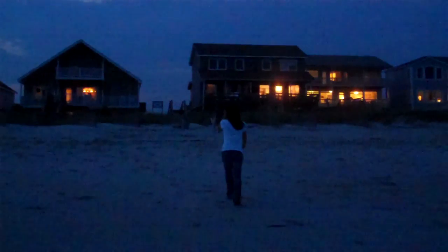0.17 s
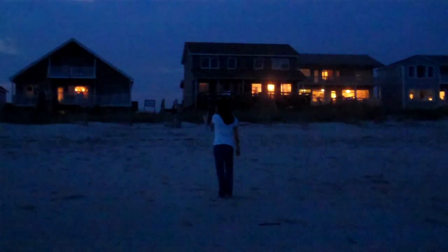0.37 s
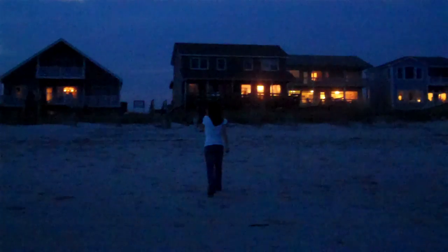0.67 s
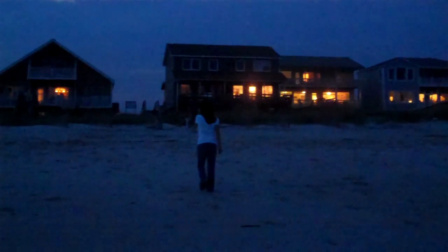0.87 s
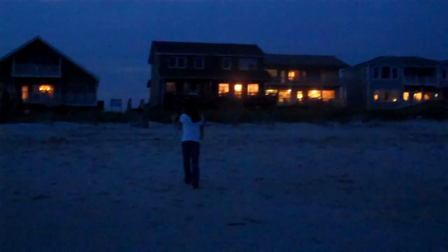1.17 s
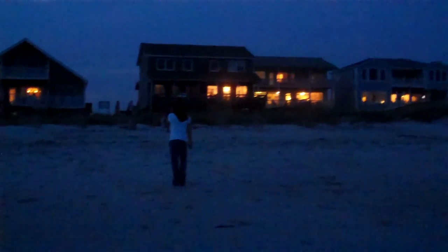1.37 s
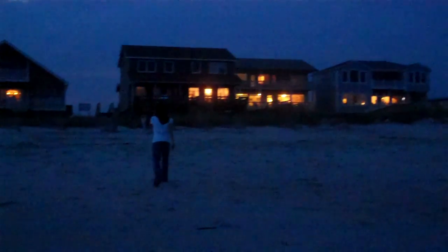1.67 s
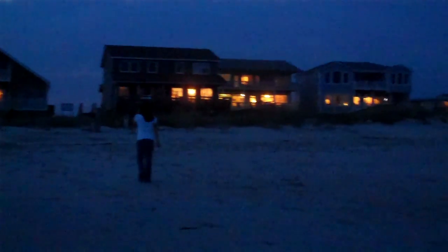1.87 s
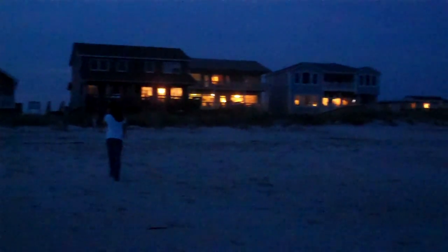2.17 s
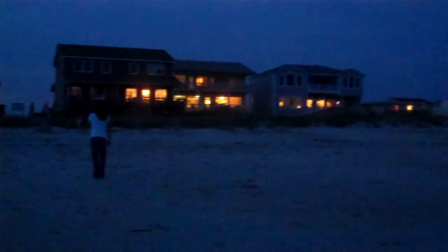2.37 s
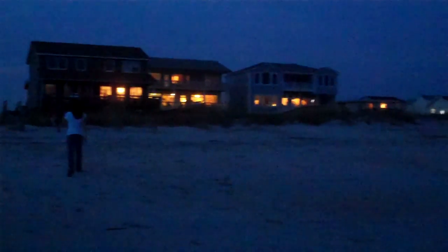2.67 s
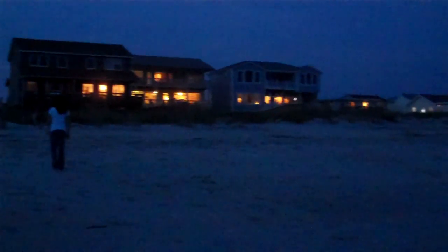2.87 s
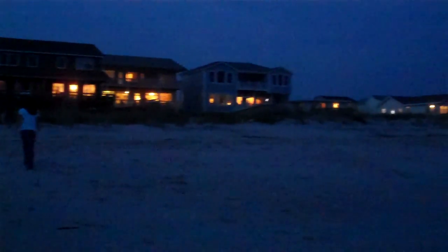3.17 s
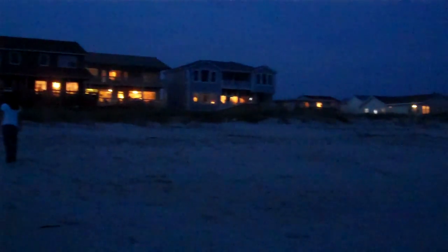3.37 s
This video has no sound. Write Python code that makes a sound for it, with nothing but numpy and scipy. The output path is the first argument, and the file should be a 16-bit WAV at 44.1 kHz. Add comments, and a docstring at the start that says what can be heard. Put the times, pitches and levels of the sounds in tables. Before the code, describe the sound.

Wind buffets a camera's stereo microphone on an open beach, light flutters first, then hard thumping, distorted gusts from the middle onward, over a continuous soft rush of surf with no distinct wave crashes.

```python
"""Windy beach surf

Surf rushes steadily while wind buffets the two ports of a camera microphone.
The surf is noise with drifting patches, shaped in short-time spectra and shared in part by the ports.
Each port has its own lumpy low rumble, short noise bursts for eddies and sharp pressure snaps.
The camera's gain control ducks on the loudest blows; overload clips; the left port drops out once."""
import sys
import numpy as np
from scipy import signal
from scipy.fft import rfft, irfft
from scipy.io import wavfile
from scipy.ndimage import uniform_filter1d

SR = 44100
rng = np.random.default_rng(int(sys.argv[2]) if len(sys.argv) > 2 else 0)


def decibels_to_gain(level_db):
    """Convert a level in decibels to a linear amplitude gain (20 dB per decade)."""
    exponent = np.asarray(level_db, float) / 20
    return 10 ** exponent


def wrap_up_sound(samples):
    """Save the sound to the file named by the first command line argument, as 16-bit audio."""
    columns = np.atleast_2d(samples).T
    # keep every value between -1 and 1, then stretch to whole-number steps
    tamed = np.clip(columns, -1, 1)
    steps = np.round(tamed * 32767).astype(np.int16)
    wavfile.write(sys.argv[1], SR, steps)


N = 154791  # samples


def evened(x):
    """Scales to rms 1."""
    return x / np.sqrt(np.mean(x ** 2) + 1e-20)


def read(points, hz):
    """Reads a table on a log-frequency axis."""
    f, value = np.transpose(points)
    return np.interp(np.log(hz + 1), np.log(f + 1), value)


def colour(x, points):
    """Filters noise to a spectrum, then scales it to rms 1."""
    gain = decibels_to_gain(read(points, np.fft.rfftfreq(N, 1 / SR)))
    return evened(irfft(rfft(x) * gain, N))


# swell of the surf: [t/s, level/dB, tilt/dB of the body under the hiss]
SURF_SWELL = [(0, -29.5, 0.7), (.75, -28.5, 2), (1.25, -27, 0.4), (1.7, -28.5, -0.5), (1.88, -30.5, 0),
              (2.3, -32.5, -3.5), (2.7, -32, -0.5), (3.101, -29.5, -2.5), (3.5, -32.5, -1)]
# tone of the surf: [f/Hz, relative level/dB]
SURF_SPECTRUM = [(60, -12), (200, -8.5), (344, -4), (800, -8), (1700, -11), (2150, -14.5), (2700, -18.5),
                 (4500, -20), (8530, -32.5), (10700, -39), (13900, -68)]
# how alike the surf is at the two ports: [f/Hz, likeness 0 to 1]
PORT_LIKENESS = [(100, 0.89), (400, 1), (1600, 0.86), (2500, 0.41), (4500, 0.74), (7000, 0.43),
                 (8500, 0.66), (12000, 0.41)]
# phase of the shared surf, left ahead of right: [f/Hz, lead/rad], negative where left lags
LEFT_LEAD = [(100, -0.4), (1500, -0.76), (2930, -2.5), (5500, -3), (7750, -5), (12000, -10.5)]
# surf balance, left minus right: [f/Hz, difference/dB]
LEFT_BALANCE = [(1880, -2), (3070, -3.5), (5020, -5.5), (8220, -10), (13400, -12.5)]


def surf(patchy_db=0.94, flicker_db=0.19):
    """Random short-time spectra with drifting patches, reaching the two ports with a lag."""
    size, hop, body_hz = 1024, 256, 2500
    frames, hz = N // hop + 5, np.fft.rfftfreq(size, 1 / SR)
    a, b, c, d, patches = rng.standard_normal((frames, len(hz), 5)).T
    patches = uniform_filter1d(patches, size=14, axis=0)  # across frequency
    patches = evened(uniform_filter1d(patches, size=12, axis=1))  # across time
    flicker = evened(uniform_filter1d(rng.standard_normal(frames), size=16))

    # the left port hears part of the right port's noise, turned in phase, and part of its own
    likeness = np.clip(read(PORT_LIKENESS, hz), -1, 1)[:, None]
    right, own = a + 1j * b, c + 1j * d
    left = likeness * right + np.sqrt(1 - likeness ** 2) * own
    left = left * np.exp(1j * read(LEFT_LEAD, hz))[:, None]
    half = decibels_to_gain(read(LEFT_BALANCE, hz) / 2)[:, None]
    spectra = np.array([left * half, right / half])

    s, level_db, tilt_db = np.transpose(SURF_SWELL)
    body = 1 / (1 + (hz / body_hz) ** 4)
    tilt = body[:, None] * np.interp(np.arange(frames) * hop / SR, s, tilt_db)
    tone_db = read(SURF_SPECTRUM, hz)[:, None] + tilt
    spectra *= decibels_to_gain(tone_db + patchy_db * patches + flicker_db * flicker)
    noise = signal.istft(spectra, nperseg=size, noverlap=size - hop)[1][:, :N]
    return decibels_to_gain(np.interp(np.arange(N) / SR, s, level_db)) * evened(noise)


# gusts, before the lumps are added: [t/s, left port level/dB, right port level/dB]
GUST_LEVEL = [(0, -30, -29), (.5, -37.5, -28), (.95, -33, -31.5), (1.15, -32, -29), (1.3, -21.5, -23.5),
              (1.45, -21, -20.5), (1.62, -28.5, -29.5), (1.779, -17, -21.5), (1.95, -21.5, -30),
              (2.17, -18, -18), (2.31, -29, -33), (2.45, -18.5, -23.5), (2.7, -33.5, -39),
              (2.88, -29, -31.5), (3.05, -14.5, -18.5), (3.28, -48, -44), (3.5, -25.5, -30)]
# tone of the rumble and of soft eddies: [f/Hz, relative level/dB]
RUMBLE_SPECTRUM = [(12, -44), (25, -4), (60, 0.5), (150, -5), (350, -13), (900, -31), (2500, -72)]


def rumble():
    """Low noise in random lumps, unrelated at the two ports."""
    lump_db, lump_s, tallest = 6, 0.01, 1.3  # spread, smoothing length, cap in spreads
    s, *port_db = np.transpose(GUST_LEVEL)
    t, width = np.arange(N) / SR, max(int(lump_s * SR), 2)
    lumps = uniform_filter1d(rng.standard_normal((2, N)), width)
    lumps = evened(uniform_filter1d(lumps, width))
    gust_db = np.array([np.interp(t, s, db) for db in port_db])
    noise = colour(rng.standard_normal((2, N)), RUMBLE_SPECTRUM)
    return decibels_to_gain(gust_db + lump_db * np.minimum(lumps, tallest)) * noise


# the strongest eddies: [middle t/s, length at half height t/s, level/dB, port 0 left 1 right]
EDDY_BURSTS = [(0.076, 0.022, -17, 1), (0.153, 0.018, -20, 1), (0.629, 0.039, -15.5, 1),
               (0.945, 0.022, -19, 1), (1.205, 0.026, -21, 0), (1.41, 0.023, -12, 0),
               (1.458, 0.018, -13, 1), (1.504, 0.034, -16, 0), (1.558, 0.028, -14, 0),
               (1.57, 0.019, -11, 1), (1.634, 0.016, -16.5, 1), (1.699, 0.019, -16, 0),
               (1.762, 0.02, -9.5, 0), (1.794, 0.016, -12.5, 0), (1.795, 0.029, -12, 1),
               (1.873, 0.047, -15, 0), (2.168, 0.03, -15, 1), (2.175, 0.022, -11.5, 0),
               (2.252, 0.026, -15.5, 0), (2.364, 0.028, -10.5, 0), (2.394, 0.028, -11, 0),
               (2.502, 0.01, -14, 0), (2.819, 0.037, -17.5, 0), (2.93, 0.018, -11, 0),
               (2.993, 0.045, -15, 0), (3.031, 0.026, -16, 0), (3.045, 0.022, -14.5, 1),
               (3.06, 0.014, -5, 0), (3.115, 0.014, -7, 0), (3.129, 0.01, -9.5, 0),
               (3.134, 0.0094, -9.5, 1), (3.179, 0.016, -15.5, 0)]
# tone of a hard eddy: [f/Hz, relative level/dB]
HARD_EDDY_SPECTRUM = [(12, -37), (25, -1.5), (60, -1), (220, -1.5), (400, -9), (900, -24.5), (3000, -44.5),
                      (6000, -77)]


def eddies():
    """Each eddy is a burst of turbulence at one port; harder ones are brighter."""
    soft_db, hard_db = -17, -14.5  # eddies brighten between these levels
    noise = rng.standard_normal((2, N))
    dull, bright = colour(noise, RUMBLE_SPECTRUM), colour(noise, HARD_EDDY_SPECTRUM)
    t, out = np.arange(N) / SR, np.zeros((2, N))
    for middle, length, level_db, port in EDDY_BURSTS:
        port = round(port)
        start, end = int((middle - 2 * length) * SR), int((middle + 2 * length) * SR)
        near = slice(max(start, 0), end)
        hard = np.clip((level_db - soft_db) / (hard_db - soft_db), 0, 1)
        shape = np.exp(-np.log(2) * (2 * (t[near] - middle) / length) ** 2)
        burst = shape * ((1 - hard) * dull[port, near] + hard * bright[port, near])
        out[port, near] += decibels_to_gain(level_db) * evened(burst) * np.sqrt(np.mean(shape ** 2))
    return out


# sharp pressure snaps inside the gusts: [t/s, dip level/dB, f/Hz, port 0 left 1 right]
PRESSURE_SNAPS = [(0.2215, -11.5, 192, 0), (1.276, -3, 312, 1), (1.348, -7.5, 250, 1),
                  (1.4011, -5.5, 735, 0), (1.4424, -9, 235, 0), (1.4547, -5, 466, 1),
                  (1.5674, -2.5, 270, 1), (1.7342, -9.5, 300, 0), (1.7567, -5, 497, 0),
                  (1.7759, -2, 280, 0), (1.7918, -5.5, 300, 0), (1.7945, -0.5, 540, 0),
                  (1.8124, -4, 232, 1), (2.0487, -15, 200, 0), (2.0724, -8, 570, 1), (2.1164, -12, 230, 0),
                  (2.1668, -5.5, 650, 1), (2.3904, -3, 205, 0), (2.587, -6, 275, 0),
                  (2.8534, -11.5, 148.7, 0), (3.0832, 0, 300, 0), (3.0906, -0.5, 275, 0),
                  (3.109, -6, 710, 0)]


def snaps():
    """Each snap is a sharp pressure dip with a small rise on either side, slightly skewed at random."""
    half_width = 0.55  # cycles from the middle to 1/e
    out, t = np.zeros((2, N)), np.arange(-600, 600) / SR
    skews = rng.uniform(-1, 1, (len(PRESSURE_SNAPS), 1))
    for (s, dip_db, hz, port), skew in zip(PRESSURE_SNAPS, skews):
        bell = np.exp(-(t * hz / half_width) ** 2)
        dip = -bell * np.cos(2 * np.pi * hz * t + 0.21 * skew)
        start = round(s * SR) - len(t) // 2
        out[round(port), start:start + len(t)] += decibels_to_gain(dip_db) * dip
    return out


# how much deeper wind pressure dips than it peaks: [left port, right port], share of its square
PORT_SUCTION = [.3, .02]


def scene():
    """Surf and wind; the wind sucks at a port harder than it pushes."""
    sea = surf()
    wind = rumble() + eddies() + snaps()
    square = wind ** 2
    pull = square - uniform_filter1d(square, size=2000)  # without its slow offset
    return sea + wind - np.array(PORT_SUCTION)[:, None] * pull


def gain_control(dry):
    """Gain falls quickly on loud blows and recovers slowly; both ports follow the louder one."""
    duck_from_db, duck_share = -11, 0.6  # threshold, share of the excess taken off
    release_db_per_s = 4  # fall of the held level
    power = uniform_filter1d((dry ** 2).max(0), size=1300)
    power_db = 10 * np.log10(abs(power) + 1e-12)
    fall = np.arange(N) * release_db_per_s / SR
    held_db = np.maximum.accumulate(power_db + fall) - fall
    over_db = np.maximum(held_db - duck_from_db, 0)
    late_db = signal.lfilter([1 / 900], [1, 1 / 900 - 1], over_db)  # lags by about 900 samples
    return dry / decibels_to_gain(duck_share * late_db)


# the left port falls silent for a moment during a hard gust: [start t/s, end t/s]
LEFT_CUT = 1.7875, 1.7912


def dropout(x):
    """Mutes the left port briefly, with edges a few samples long."""
    start, end = LEFT_CUT
    live = np.ones((2, N))
    live[0, round(start * SR):round(end * SR)] = 0
    return uniform_filter1d(live, size=7) * x


def top_cut(x):
    """Nothing passes above the cut-off."""
    return signal.sosfilt(signal.butter(12, 14040, fs=SR, output="sos"), x)


def record(dry):
    """The camera ducks loud wind, clips what still overloads and drops the left port once."""
    clipped = np.clip(gain_control(dry), -1, 1)
    return top_cut(dropout(clipped))


dry = scene()
out = record(dry)
wrap_up_sound(out)
```